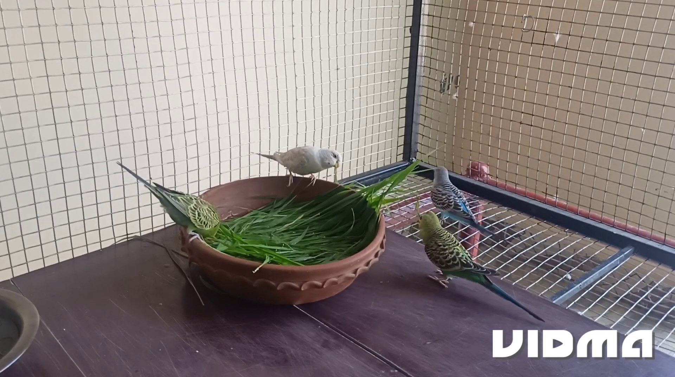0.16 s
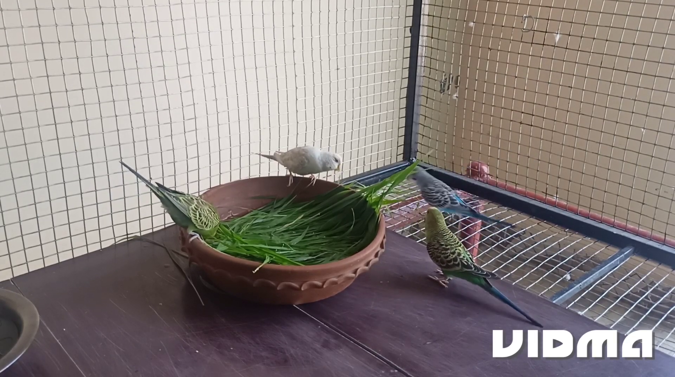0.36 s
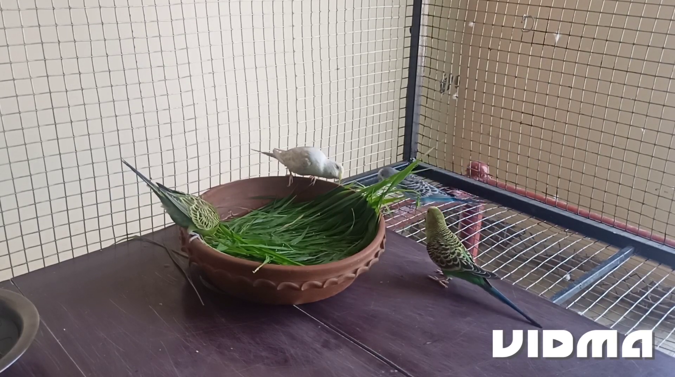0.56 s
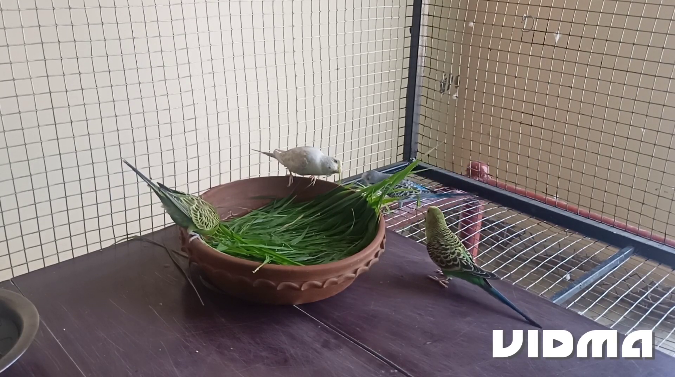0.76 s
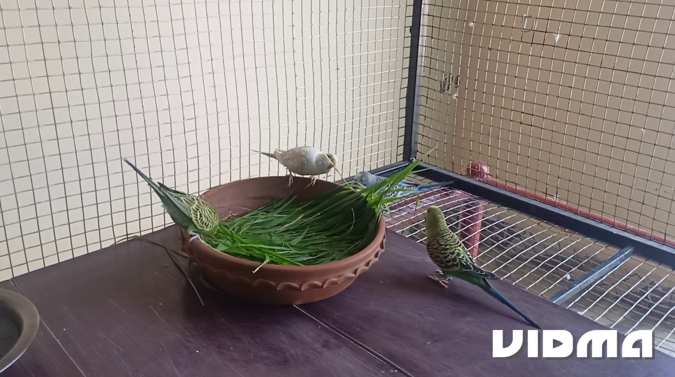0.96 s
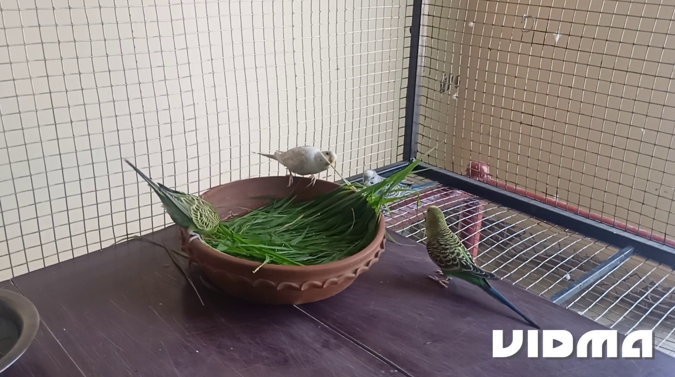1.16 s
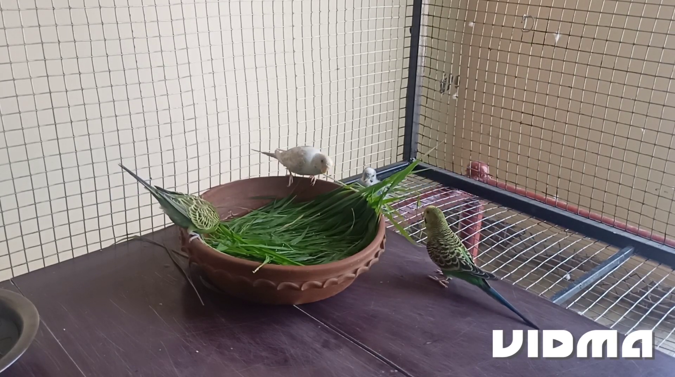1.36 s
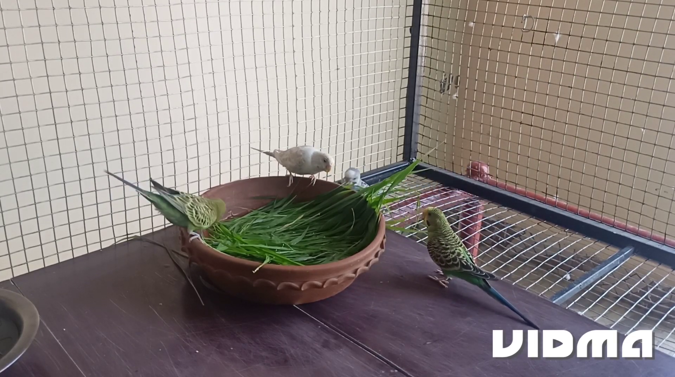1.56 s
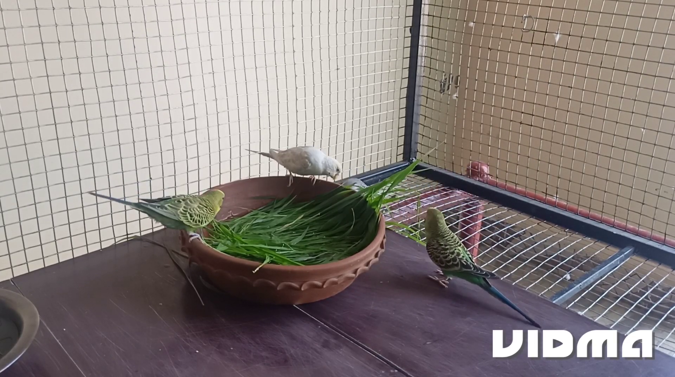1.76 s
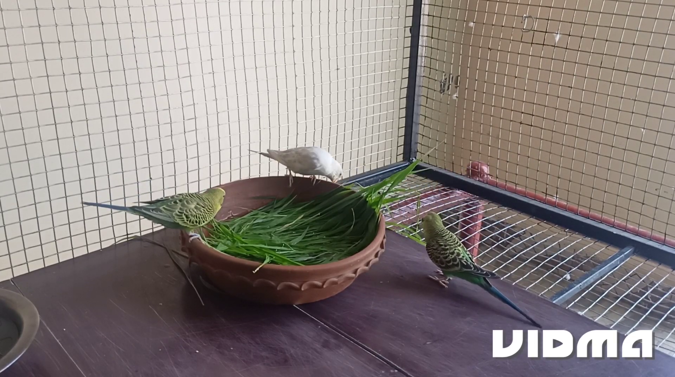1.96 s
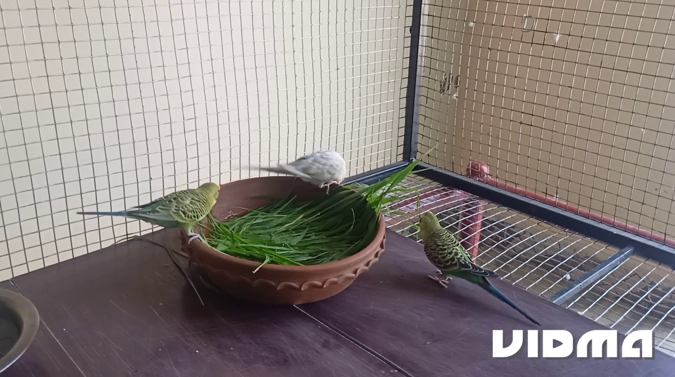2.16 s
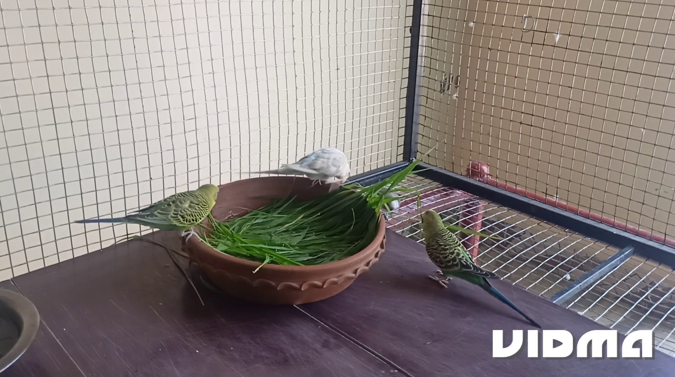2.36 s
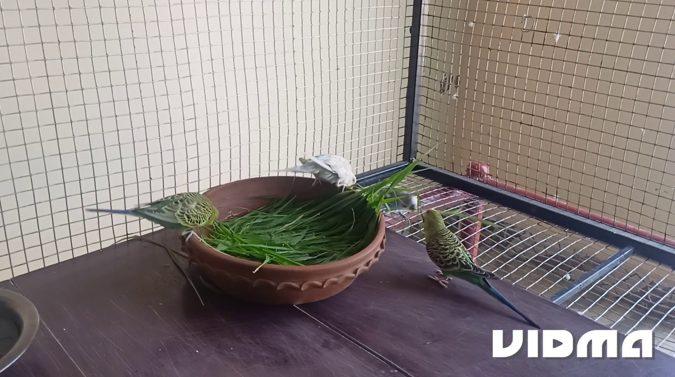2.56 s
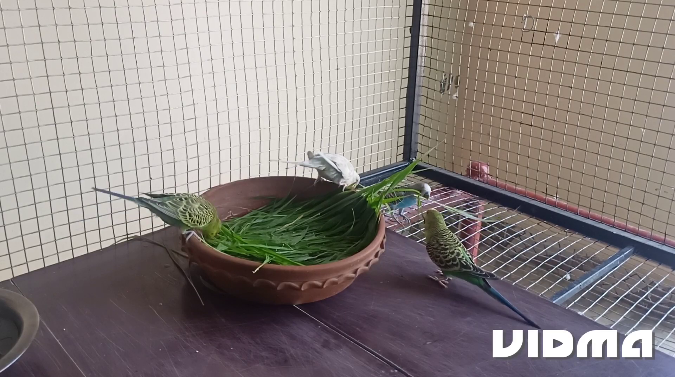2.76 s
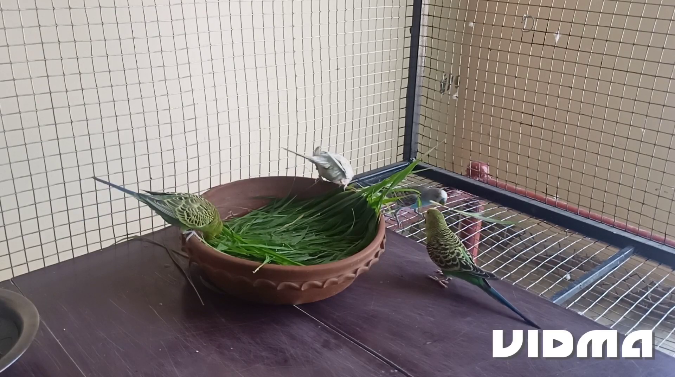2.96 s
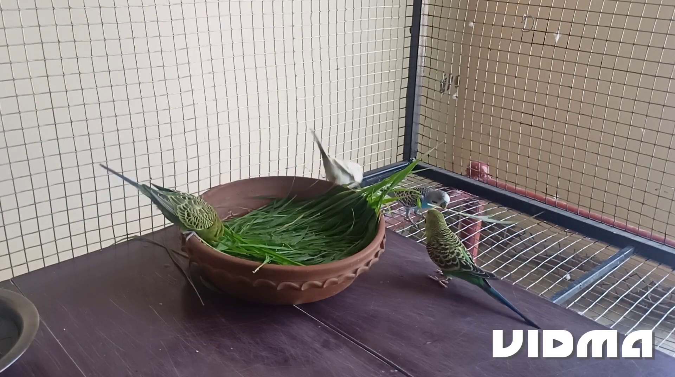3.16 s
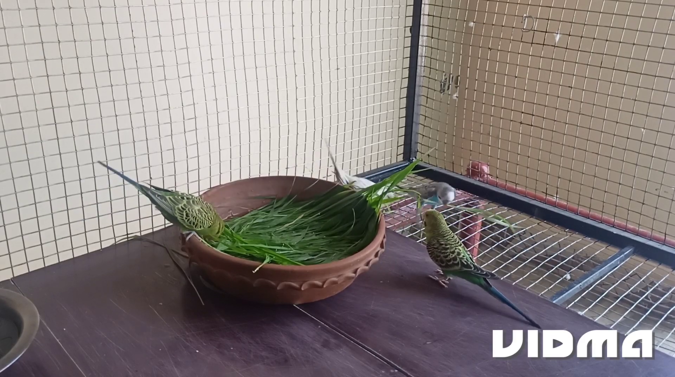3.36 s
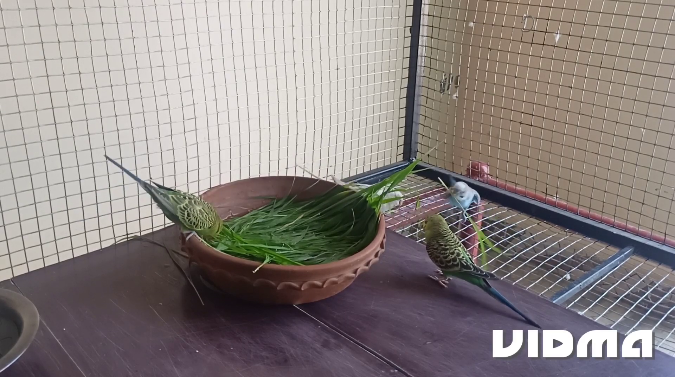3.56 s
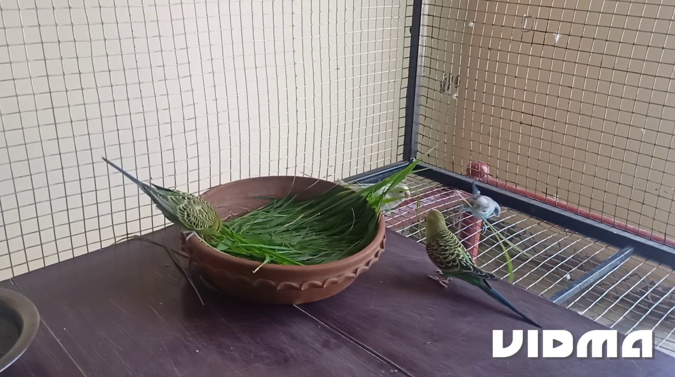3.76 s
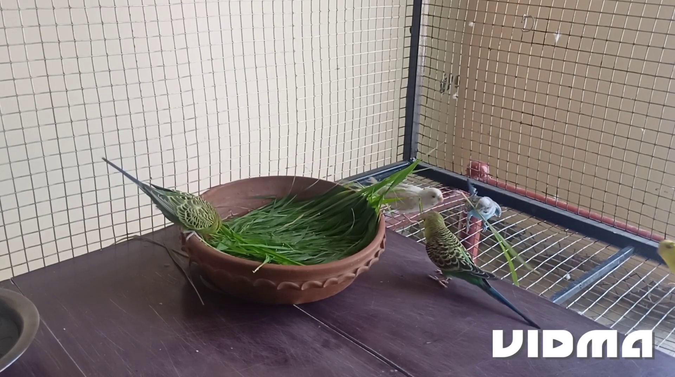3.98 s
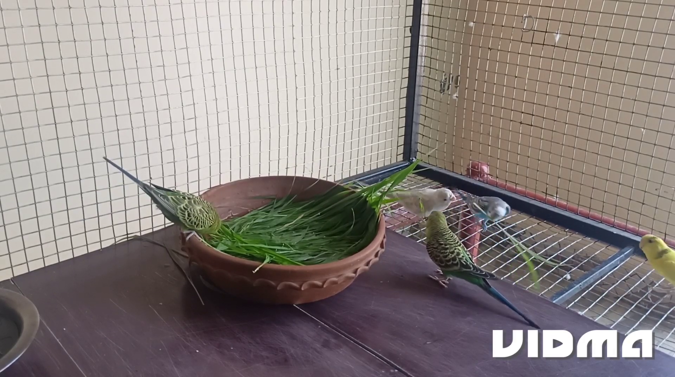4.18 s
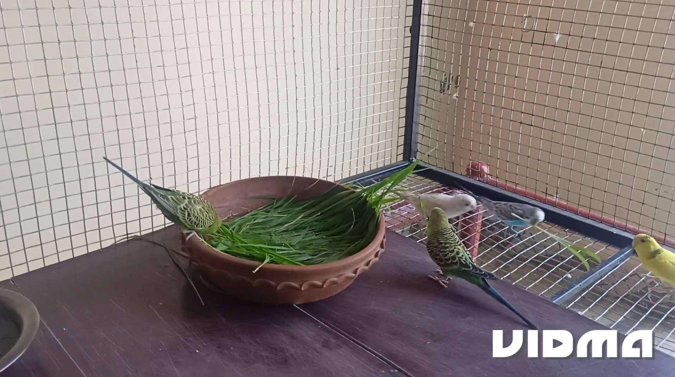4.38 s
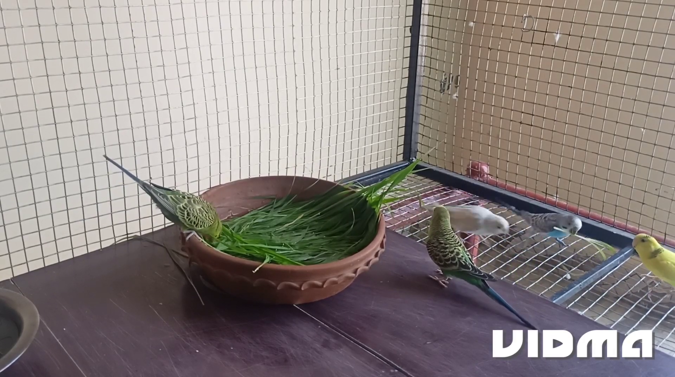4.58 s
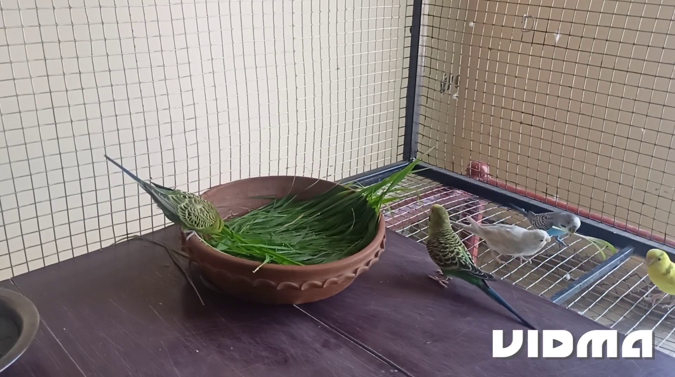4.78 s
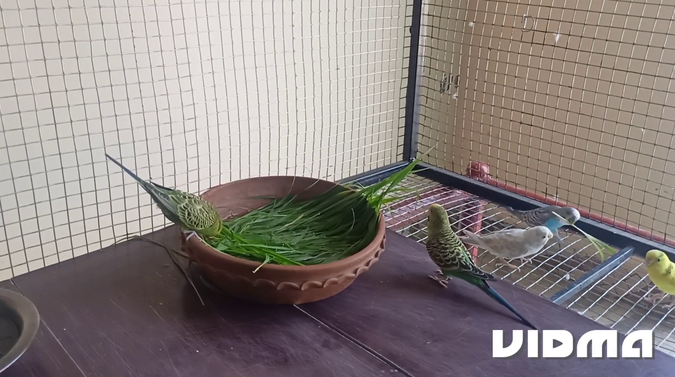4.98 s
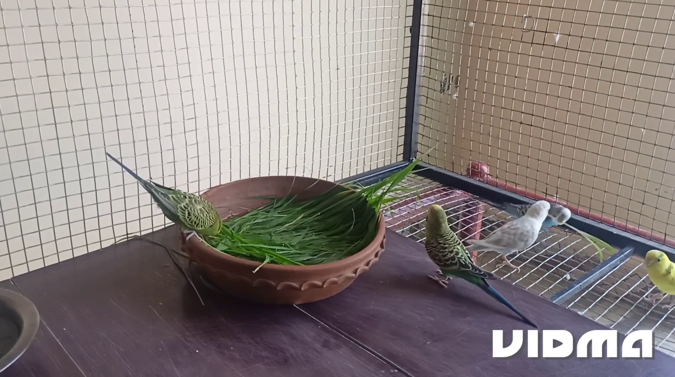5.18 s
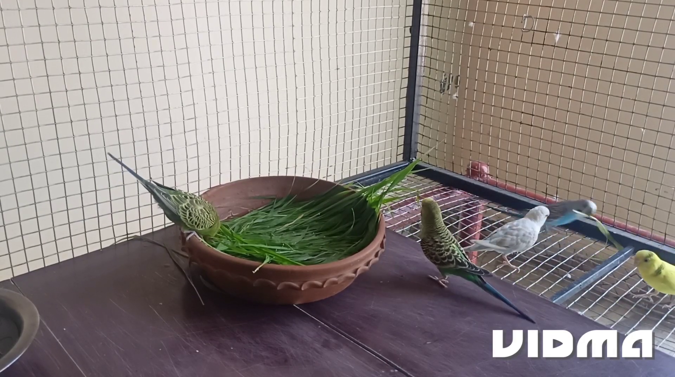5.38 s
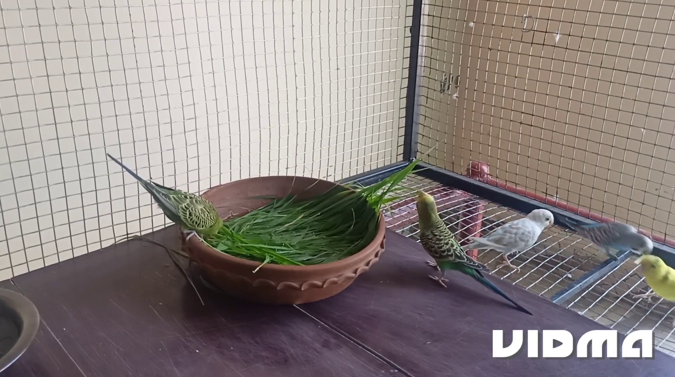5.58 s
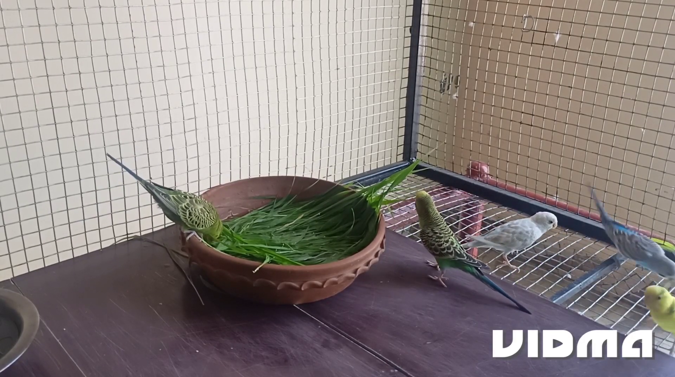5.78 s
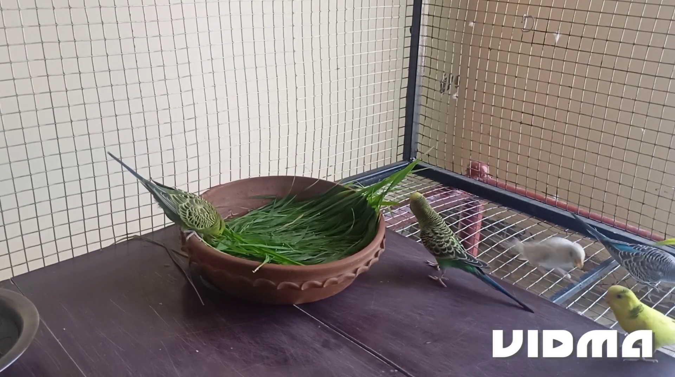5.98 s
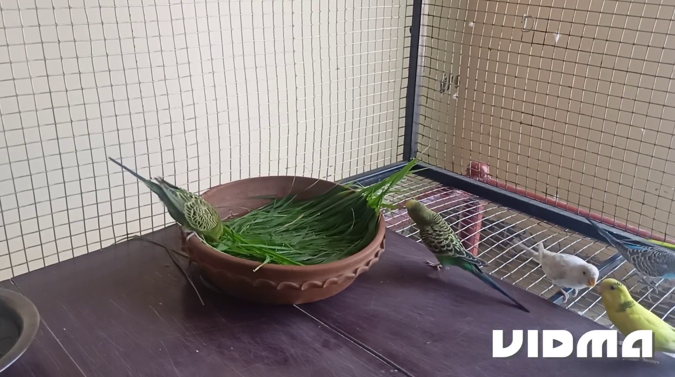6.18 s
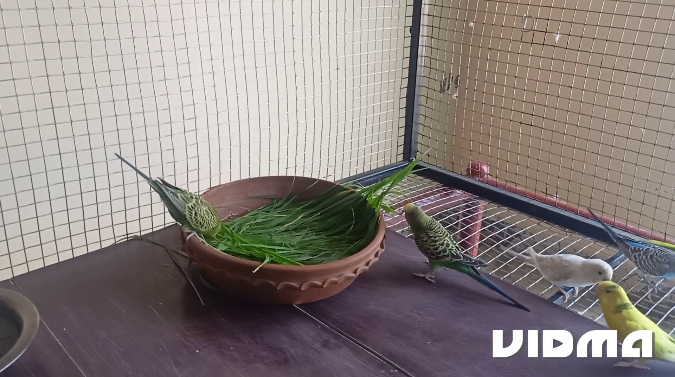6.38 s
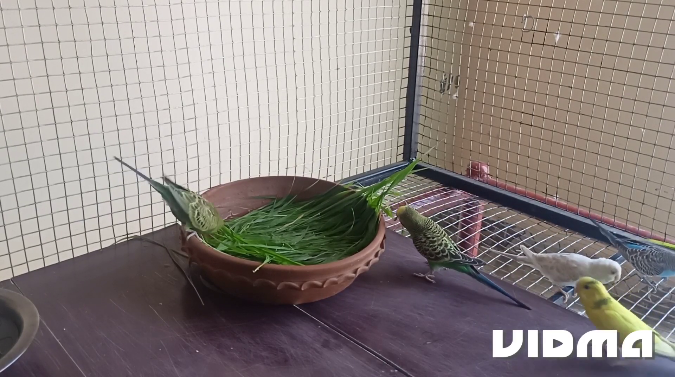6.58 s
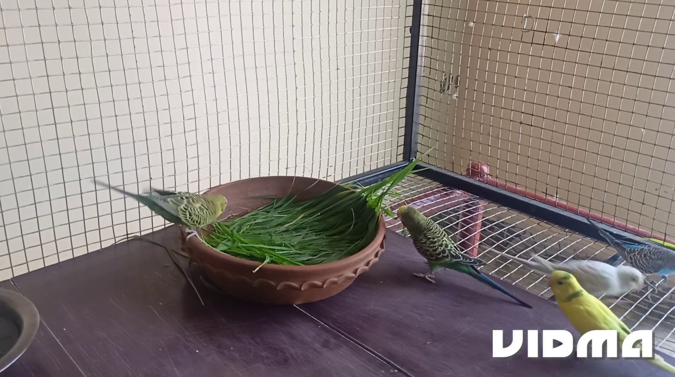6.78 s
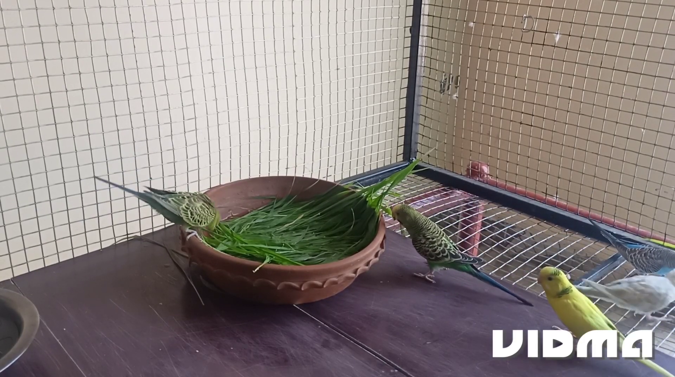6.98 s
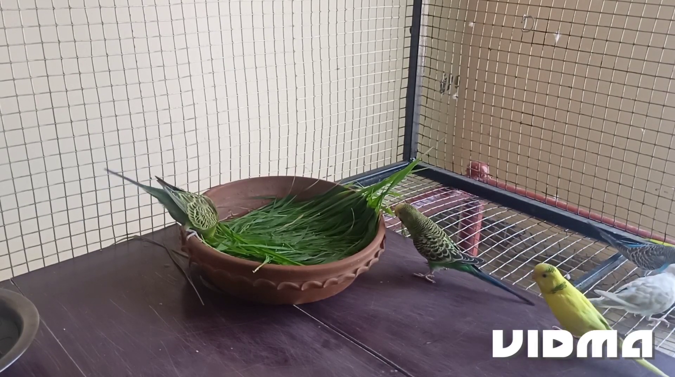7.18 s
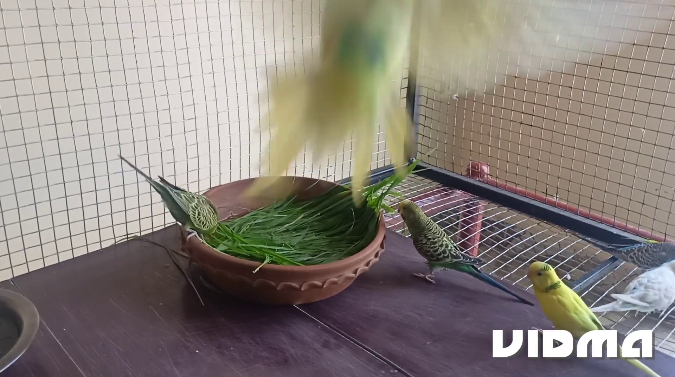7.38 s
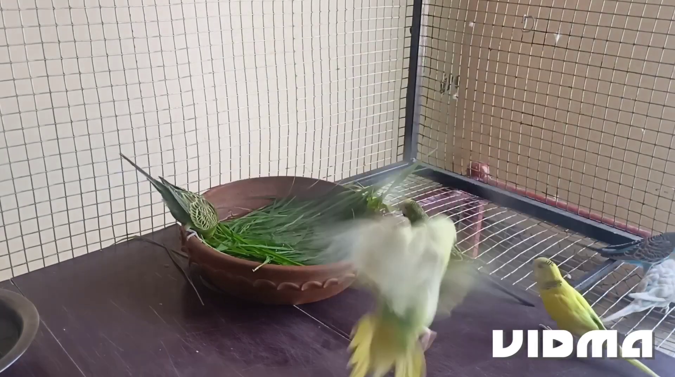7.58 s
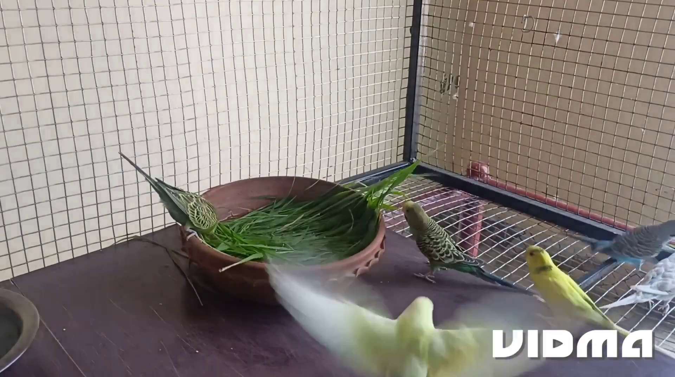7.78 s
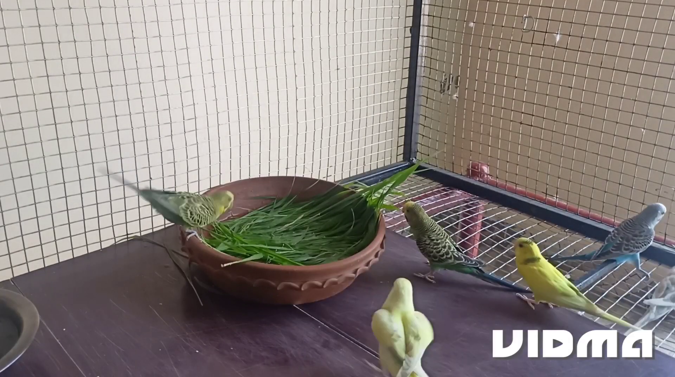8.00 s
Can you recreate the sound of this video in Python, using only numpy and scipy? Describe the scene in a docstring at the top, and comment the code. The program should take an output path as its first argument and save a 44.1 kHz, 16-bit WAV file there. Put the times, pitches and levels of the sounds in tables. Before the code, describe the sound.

Budgerigars feed quietly in a wire aviary, with sharp little beak and claw ticks and a faint rustle of grass. Small birds twitter far off over a low outdoor hush. Near the end one budgerigar gives a loud, falling chirp that breaks into a rasp. Wings then hum and swish in a quickening flurry, passing so close that the air thumps the microphone.

```python
"""Budgerigars in a balcony aviary

Budgerigars feed on grass in a wire cage: beaks and claws tick, blades rustle, the mesh rings.
Small birds twitter far off over a low outdoor wash. One budgerigar gives a loud, falling chirp,
a whistle that breaks into a rasp. Then wings hum and swish in a quickening flurry, and a bird
flies in so close that its downwash buffets the microphone."""
import sys
import numpy as np
from scipy import signal
from scipy.fft import rfft, irfft
from scipy.io import wavfile

SR = 44100
rng = np.random.default_rng(int(sys.argv[2]) if len(sys.argv) > 2 else 0)


def wav_out(sig):
    """Save sig, one row per channel (or a flat mono array), as 16-bit PCM at SR to the path in sys.argv[1]."""
    wavfile.write(sys.argv[1], SR, np.round(np.clip(np.atleast_2d(sig).T, -1, 1) * 32767).astype(np.int16))


N = 354608
T = np.arange(N) / SR
BAND_LIMIT_HZ = 15520


def amp(db):
    """Decibels to gain."""
    return 10 ** (np.asarray(db) / 20)


def unit_rms(x):
    """Scales to rms 1."""
    return x / np.sqrt(np.mean(x ** 2) + 1e-20)


def at_hz(points, hz):
    """Interpolates (frequency, value) points over log frequency."""
    point_hz, value = np.transpose(points)
    return np.interp(np.log(hz + 1), np.log(point_hz + 1), value)


def colour(x, spectrum):
    """Filters x by (frequency [Hz], gain [dB]) points."""
    hz = np.fft.rfftfreq(len(x), 1 / SR)
    return irfft(rfft(x) * amp(at_hz(spectrum, hz)), len(x))


def noise(spectrum):
    """Steady coloured noise, rms 1."""
    return unit_rms(colour(rng.standard_normal(N), spectrum))


def wander(cutoff_hz):
    """Smooth random motion, rms 1."""
    lowpass = np.exp(-(np.fft.rfftfreq(N, 1 / SR) / cutoff_hz) ** 2)
    return unit_rms(irfft(rfft(rng.standard_normal(N)) * lowpass, N))


def grainy_noise(spectrum, grain_db, grain_hz):
    """Coloured noise with a flickering level, rms 1."""
    return unit_rms(colour(rng.standard_normal(N) * amp(grain_db * wander(grain_hz)), spectrum))


def bell(centre_s, sigma_s):
    """Gaussian envelope, peak 1."""
    return np.exp(-.5 * np.minimum(((T - centre_s) / sigma_s) ** 2, 200))


def swell(start_s, length_s):
    """Rises to 1 in a quarter of length_s, then falls more slowly."""
    u = np.clip((T - start_s) / (length_s / 4), 0, 60)
    return u * np.exp(1 - u)


def add(mix, start_s, sound):
    """Mixes a sound in at start_s."""
    part = mix[max(round(start_s * SR), 0):][:len(sound)]
    part += sound[:len(part)]


# Chirp contour: (time [s], pitch [Hz], rasp [0-1], effort [dB])
CHIRP_CONTOUR = [(6.735, 2604, 0, -2), (6.742, 3070, 0.08, 0.5), (6.751, 3890, 0.5, 0),
                 (6.762, 3018, 0.26, 2.5), (6.782, 2320, 0.32, -4), (6.801, 2308, 0.33, 1),
                 (6.811, 2147, 0.48, -1.5), (6.819, 1613, .9, -2.5), (6.83, 1703, 0.78, -4.5),
                 (6.834, 1880, 0.13, -0.5), (6.851, 1975, 0.13, -0.5), (6.86, 1916, 0.61, -1),
                 (6.873, 2012, 0.33, 4), (6.878, 2770, 0.3, 1.5)]
# Throat response: (frequency [Hz], gain [dB])
THROAT_SPECTRUM = [(900, -44), (1500, -13), (2100, -2), (3000, 0.5), (4000, 5.5), (4600, -4.5), (5400, -1),
                   (6100, -15), (7800, -9), (10000, -27.5), (13000, -30), (15200, 3)]


def chirp(gain_db=-40, attack_s=.0085, release_s=.0065, jitter=.16, tilt_db_per_oct=-6, rasp_hz=230):
    """A whistle leaps up, falls and breaks into a pulsing rasp; the throat shapes its partials."""
    times, *columns = np.transpose(CHIRP_CONTOUR)
    hz, rasp, effort_db = (np.interp(T, times, column) for column in columns)
    gate = np.clip(np.minimum((T - times[0]) / attack_s, 1 - (T - times[-1]) / release_s), 0, 1)
    sounding = gate > 0
    phase = 2 * np.pi * np.cumsum(hz * (1 + jitter * rasp * wander(880))) / SR
    orders = np.arange(1, 8, .5)[:, None]
    partial_hz = orders * hz[sounding]
    gains = amp(at_hz(THROAT_SPECTRUM, partial_hz) + tilt_db_per_oct * np.log2(orders))
    gains *= partial_hz < BAND_LIMIT_HZ
    gains *= np.where(orders % 1, amp(-6) * rasp[sounding], 1)  # half orders grow with the rasp
    voice = np.zeros(N)
    voice[sounding] = (gains * np.sin(orders * phase[sounding])).sum(0) / np.sqrt((gains ** 2).sum(0) / 2)
    voice += amp(-4) * np.sqrt(rasp) * noise(THROAT_SPECTRUM)  # breath
    pulsing = np.sin(2 * np.pi * np.cumsum(rasp_hz * (1 + .5 * wander(200))) / SR)
    voice *= 1 + np.tanh(1.1 * rasp) * pulsing
    return balcony(amp(gain_db + effort_db) * gate * voice, wet_db=-8)


def downstroke_times(takeoff_s=7.175, first_gap_s=.06055, gap_step_s=.0009, count=17):
    """The wingbeat quickens steadily as the bird climbs and brakes."""
    k = np.arange(count)
    return takeoff_s + first_gap_s * k - gap_step_s * k * (k - 1) / 2


# Flight: (time [s], effort [dB], hum pitch [Hz], upstroke re downstroke [dB])
FLIGHT_CONTOUR = [(7.17, -7.5, 485, -20.5), (7.27, 1, 460.7, -19.5), (7.58, -1, 432.7, -8),
                  (7.67, 1, 449.3, -3), (7.781, 0, 533.7, 0.5), (7.891, -0.5, 446.7, -3.5),
                  (8.04, -8, 439, -4)]
# Feather swish: (frequency [Hz], gain [dB])
FEATHER_SPECTRUM = [(200, -14), (450, 21.5), (750, 11), (1100, 7), (1800, 1.5), (2800, 0.5), (4500, 2.5),
                    (6300, -0.5), (8200, 3), (10500, -5), (12500, -3), (15200, 2)]


def wings(hum_db=-42.5, swish_db=-44.5, stroke_sigma_s=.0079, upstroke_lag_s=.028, flutter=1.62):
    """Each downstroke hums and swishes; as the bird brakes, the upstroke joins and the hum breaks up."""
    hum, swish_power = np.zeros(N), np.zeros(N)
    waver = .0601 * wander(121)
    times, *columns = np.transpose(FLIGHT_CONTOUR)
    beats = downstroke_times()
    for beat_s, (start_cycles, detune) in zip(beats, rng.uniform(-1, 1, (len(beats), 2))):
        effort_db, hz, upstroke_db = (np.interp(beat_s, times, column) for column in columns)
        braking = amp(upstroke_db)
        stroke = bell(beat_s, stroke_sigma_s) + braking * bell(beat_s - upstroke_lag_s, stroke_sigma_s)
        pitch_hz = hz * (1 + .15 * braking * detune + (1 + flutter * braking) * waver)
        tone = np.sqrt(2) * np.sin(2 * np.pi * (np.cumsum(pitch_hz) / SR + start_cycles))
        hum += amp(hum_db + effort_db) * stroke * tone
        stirred_air = amp(-13) * bell(beat_s + .03, .04)
        swish_power += amp(swish_db + .77 * effort_db) ** 2 * (stroke ** 2 + stirred_air ** 2)
    swish = np.sqrt(swish_power) * grainy_noise(FEATHER_SPECTRUM, grain_db=3, grain_hz=680)
    return balcony(hum, wet_db=-9) + balcony(swish, wet_db=-6)


# Stirred air, strongest as the bird passes: (time [s], level [dB])
WAKE_LEVEL = [(7.14, -68), (7.184, -49.5), (7.24, -48.5), (7.29, -43), (7.375, -46), (7.42, -37),
              (7.53, -26.5), (7.578, -32.5), (7.638, -46), (7.72, -39), (7.75, -45.5), (7.95, -44.5),
              (8.04, -53)]
# Its rumble: (frequency [Hz], gain [dB])
WAKE_SPECTRUM = [(25, -22), (60, 2.5), (150, 3), (280, -3), (450, -15), (700, -24.5), (1200, -50),
                 (3000, -52)]
# Nearest gusts: (time [s], level [dB], pitch [Hz], sigma [s])
NEAR_GUSTS = [(7.338, -28, 113, 0.004), (7.415, -21.5, 101, 0.0092), (7.456, -21, 85, 0.0072),
              (7.479, -19.5, 130, 0.0058), (7.506, -14, 160, .004), (7.521, -15.5, 140, .0055),
              (7.549, -16.5, 188, 0.0032), (7.565, -18, 138, 0.0037), (7.591, -26.5, 116, 0.0055)]


def downwash(pulse_db=7, lag_s=.0076, skew=.21):
    """Stirred air rumbles and swells after each downstroke; the nearest gusts thump the microphone."""
    puffs = sum(bell(beat_s + lag_s, sigma_s=.0096) for beat_s in downstroke_times())
    wake_db = np.interp(T, *np.transpose(WAKE_LEVEL), left=-120) + pulse_db * (puffs - 1) / 2
    out = amp(wake_db) * noise(WAKE_SPECTRUM)
    for (time_s, db, hz, sigma_s), start_cycles in zip(NEAR_GUSTS, rng.random(len(NEAR_GUSTS))):
        phase = 2 * np.pi * (hz * (T - time_s) + start_cycles)
        out += amp(db) * bell(time_s, sigma_s) * (np.sin(phase) + skew * np.sin(2 * phase))
    return out


# Beak and claw strikes: (time [s], relative level [dB], band centre [Hz])
STRIKES = [(.0378, -52, 15000), (.4645, -48, 13000), (0.6105, -32, 8200), (0.7149, -33, 8100),
           (0.8328, -30.5, 8200), (.9266, -44, 4000), (1.041, -42, 6940), (1.149, -43, 5000),
           (1.9365, -37, 9700), (2.7502, -42, 7000), (2.838, -42, 6950), (3.169, -41, 8200),
           (3.7342, -37, 7060), (3.9695, -38, 15000), (4.003, -31, 13100), (4.0215, -33, 14000),
           (4.0595, -42, 14000), (4.085, -38, 15000), (4.764, -39, 7000), (4.9673, -32, 8100),
           (6.012, -49, 8200), (7.0784, -35, 7610), (7.1628, -29, 13000), (7.3148, -21, 8360),
           (7.6345, -29, 7740), (7.7832, -23, 9000)]
# Beak and claw contact: (frequency [Hz], gain [dB])
CONTACT_SPECTRUM = [(500, -27), (1500, 5), (2600, -9), (4000, -0.5), (6000, -4), (8200, 0.5), (10500, -7.5),
                    (13000, -2.5), (15200, -2.5)]
# Mesh ring after a strike: (frequency [Hz], gain [dB])
MESH_SPECTRUM = [(5000, -32), (8200, -4), (11000, -28)]


def ticks(gain_db=-1, rattle_db=-25, rattle_decay_s=.0071, ring_decay_s=.054):
    """A hard snap of beak or claw, a brief rattle and a hissing ring of the mesh."""
    out, t = np.zeros(N), T[:2048]
    hz = np.fft.rfftfreq(len(t), 1 / SR)
    causal_fold = (1 + np.sign(t)) * (t < t.mean())
    for time_s, db, centre_hz in STRIKES:
        octaves = np.log2((hz + 1) / centre_hz)
        gain = amp(np.maximum(at_hz(CONTACT_SPECTRUM, hz) - 3 * octaves ** 2, -60))
        snap = irfft(np.exp(rfft(irfft(np.log(gain)) * causal_fold)))  # minimum phase: sharp onset
        rattle = (t == 0) + amp(rattle_db) * np.exp(-t / rattle_decay_s) * rng.standard_normal(len(t))
        add(out, time_s, amp(db + gain_db) * signal.fftconvolve(snap / abs(snap).max(), rattle))
    ring = np.exp(-T[:SR] / ring_decay_s) * rng.standard_normal(SR)
    mesh = signal.fftconvolve(colour(out, MESH_SPECTRUM), ring / np.linalg.norm(ring))[:N]
    return balcony(out, wet_db=-3) + mesh


# Tugs and nibbles: (time [s], length [s], level [dB])
GRASS_TUGS = [(0.032, .05, -62), (.115, 0.11, -66.5), (0.361, 0.073, -64.5), (.58, 0.24, -69),
              (.875, 0.037, -62.5), (1.019, .064, -64.5), (1.328, 0.025, -63.5), (1.743, 0.064, -59.5),
              (2.194, 0.13, -66.5), (3.349, 0.13, -66), (3.511, .068, -63.5), (3.67, 0.19, -65),
              (3.852, 0.092, -62), (4.005, 0.11, -60.5), (4.183, 0.037, -64.5), (4.763, 0.09, -69.5),
              (5.144, 0.16, -72.5), (5.64, 0.12, -69), (5.925, 0.17, -67.5), (6.072, .12, -64)]
# Tearing blades: (frequency [Hz], gain [dB])
GRASS_SPECTRUM = [(700, -15), (2000, -8), (4000, -5.5), (6000, -0.5), (8200, 2.5), (10500, -1),
                  (13000, 3.5), (15200, 4)]
# Shuffling: (time [s], level [dB])
SHUFFLE_LEVEL = [(0, -76), (1.7, -75), (2.1, -75.5), (3.3, -78), (3.6, -68), (4.1, -75.5), (4.5, -78.5),
                 (6.7, -80.5), (7.1, -66.5)]


def grass(sway_db=1.87):
    """Torn blades crackle in clumps over a faint, uneven shuffling."""
    tug_power = sum((amp(db) * swell(time_s, length_s)) ** 2 for time_s, length_s, db in GRASS_TUGS)
    crackle = np.sqrt(tug_power) * grainy_noise(GRASS_SPECTRUM, grain_db=5, grain_hz=300)
    shuffle_db = np.interp(T, *np.transpose(SHUFFLE_LEVEL)) + sway_db * wander(12)
    shuffle = amp(shuffle_db) * noise(CONTACT_SPECTRUM)
    return balcony(crackle, wet_db=-6) + shuffle


# Hops: (time [s], length [s], level [dB], pitch [Hz])
HOP_BUMPS = [(3.338, 0.21, -58.5, 228), (3.679, 0.077, -57, 112), (3.74, 0.053, -51, 100),
             (3.806, 0.49, -70.5, 73), (4.017, 0.13, -63, 430)]


def hops():
    """Hopping birds knock the table and cage floor, which ring briefly and dully."""
    out = np.zeros(N)
    for time_s, length_s, db, hz in HOP_BUMPS:
        resonance = [(hz / 4, -48), (hz / np.sqrt(2), -5), (hz, 0), (hz * np.sqrt(2), -10),
                     (hz * 4, -24), (SR / 2, -72)]
        out += amp(db) * swell(time_s, length_s) * noise(resonance)
    return out


# Claw plucks: (time [s], level [dB], tilt [dB/octave])
WIRE_PLUCKS = [(2.537, -73, 8), (3.275, -71.5, -6.5), (5.188, -79, 4)]
# Cage wire modes: (frequency [Hz], gain [dB], t60 [s])
WIRE_MODES = [(2265, -7.5, 0.22), (3340, 4.5, .07), (4580, 6, 0.077), (5986, -1, .055), (7400, 4, .09)]


def wire(buzz=.61, pivot_hz=4580):
    """Plucked mesh rings in thin, buzzing modes, bright or dull by where the claw catches it."""
    out, t = np.zeros(N), T[:SR // 2]
    for hz, mode_db, t60_s in WIRE_MODES:
        ring = amp(mode_db - 60 * t / t60_s) * np.sin(2 * np.pi * hz * t)
        ring *= 1 + buzz * wander(200)[:len(t)]
        for time_s, db, tilt_db_per_oct in WIRE_PLUCKS:
            add(out, time_s, amp(db + tilt_db_per_oct * np.log2(hz / pivot_hz)) * ring)
    return balcony(out, wet_db=-5)


# Far calls: (time [s], length [s], start [Hz], end [Hz], relative level [dB], hoarseness [0-1])
FAR_CALLS = [(0.076, 0.079, 6370, 5730, -70.5, 0.3), (.3, 0.083, 6800, 5760, -69.5, 0.47),
             (.52, 0.077, 6770, 5790, -67.5, 0.4), (0.909, 0.1, 4150, 5100, -65.5, 0.55),
             (1.09, 0.11, 4170, 4980, -69, 0.58), (1.289, .12, 4440, 3510, -69, .55),
             (1.327, 0.097, 4570, 5080, -72, 0.42), (1.481, 0.13, 3730, 5050, -69.5, 0.66),
             (1.639, 0.12, 4140, 3400, -66, 0.74), (2.182, .11, 3950, 3200, -73, 0.47),
             (4.276, 0.085, 4600, 4220, -74, 0.55), (5.534, 0.21, 5580, 5480, -77.5, 0.12),
             (5.784, .11, 4670, 6380, -70.5, 0.07), (6.027, .11, 4370, 6170, -71, .25),
             (6.29, 0.12, 4420, 6310, -71.5, 0.29), (6.529, 0.086, 4400, 4980, -74, .3)]


def twitters(gain_db=-4, warble_depth=.17, bend=1.6):
    """Far birds whistle thin, hoarse glides that level off; they arrive mostly as echoes."""
    out, quaver = np.zeros(N), np.tanh(wander(500))
    for time_s, length_s, start_hz, end_hz, db, hoarseness in FAR_CALLS:
        progress = np.linspace(0, 1, round(length_s * SR))
        glide = np.sin(np.pi / 2 * progress ** bend) ** 2
        depth = warble_depth * hoarseness * (1 + np.sin(np.pi * progress) - glide / 2)
        warble = depth * quaver[round(time_s * SR):][:len(progress)]
        hz = (start_hz + (end_hz - start_hz) * glide) * (1 + warble)
        envelope = amp(db + gain_db) * signal.windows.tukey(len(progress), .3)
        add(out, time_s, envelope * np.sin(2 * np.pi * np.cumsum(hz) / SR))
    return balcony(out, wet_db=1)


def trill(start_hz=3000, end_hz=2800, length_s=1.9, gain_db=-83, pulse_hz=7, waver=.014):
    """A far bird holds a pulsing whistle that sinks a little."""
    hz = np.interp(T, [0, length_s], [start_hz, end_hz]) * (1 + waver * wander(540))
    pulses = (T < length_s) * abs(np.sin(np.pi * pulse_hz * T))
    return balcony(amp(gain_db) * pulses * np.sin(2 * np.pi * np.cumsum(hz) / SR), wet_db=-.5)


# Outdoor wash as let through by the noise suppressor: (time [s], level [dB])
WASH_LEVEL = [(0, -66.5), (1.8, -65.5), (2.4, -69), (4.2, -64), (4.5, -68.5), (6.72, -68), (6.77, -59),
              (6.88, -53.5), (7.0, -62.5), (7.14, -62)]
# Its colour: (frequency [Hz], gain [dB])
WASH_SPECTRUM = [(15, -58), (25, -16.5), (59, -6.5), (164, -0.5), (240, -1), (289, 1), (359, -0.5),
                 (433, -0.5), (1800, -21), (4750, -22.5), (6730, -30.5), (7300, -32), (15500, -46)]


def outdoor_wash():
    """Low outdoor wash; its level curve mimics a noise suppressor opening during the loud chirp."""
    return amp(np.interp(T, *np.transpose(WASH_LEVEL))) * noise(WASH_SPECTRUM)


# Balcony reverberation: (frequency [Hz], t60 [s])
BALCONY_DECAY = [(200, 0.82), (1500, 0.41), (4000, 0.42), (8000, 0.36), (15000, 0.29)]


def balcony(x, wet_db, predelay_s=.003):
    """Adds dense reflections from the near walls, each band dying at its own rate."""
    taps = rng.standard_normal(SR) * (rng.random(SR) < .1) * (T[:SR] > predelay_s)
    hz, t, bands = signal.stft(taps, SR, nperseg=256)
    decay = amp(-60 * t / at_hz(BALCONY_DECAY, hz)[:, None])
    tail = signal.istft(bands * decay, SR, nperseg=256)[1]
    return x + amp(wet_db) * signal.fftconvolve(x, tail / np.linalg.norm(tail))[:N]


def scene():
    """All sources, summed to mono."""
    background = outdoor_wash() + twitters() + trill()
    feeding = grass() + ticks() + wire() + hops()
    return (background + feeding + chirp() + wings() + downwash())[None]


def record(dry):
    """Low-pass at the band limit."""
    lowpass = signal.firwin(511, BAND_LIMIT_HZ, window=("kaiser", 9), fs=SR)
    return signal.oaconvolve(dry, lowpass[None], "same")


dry = scene()
out = record(dry)
wav_out(out)
```